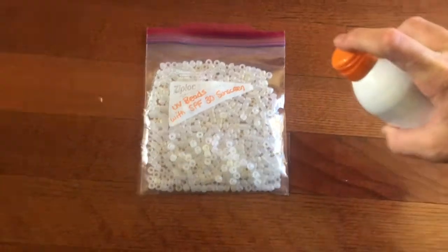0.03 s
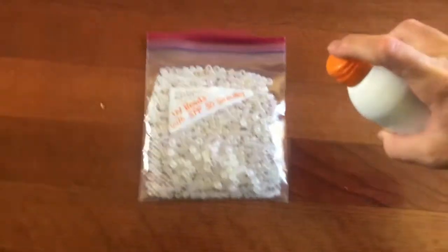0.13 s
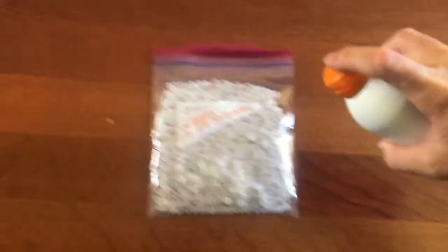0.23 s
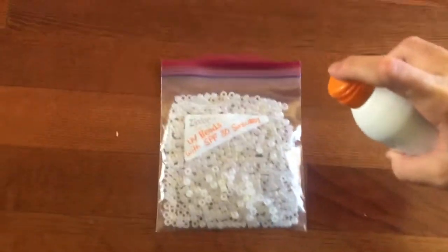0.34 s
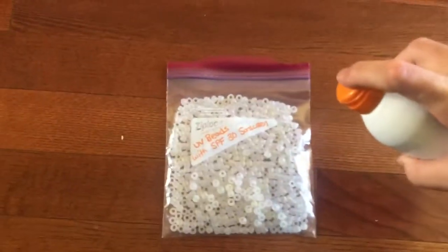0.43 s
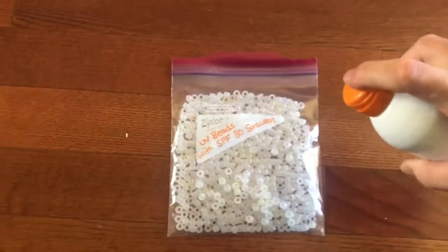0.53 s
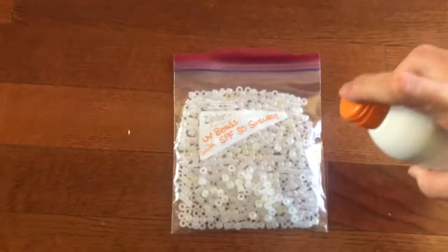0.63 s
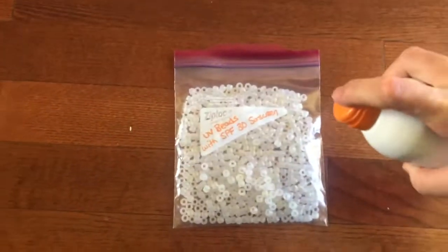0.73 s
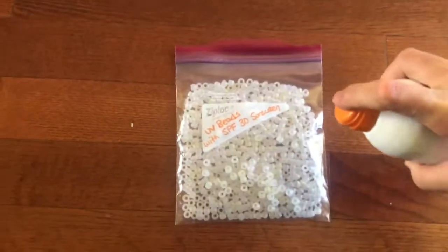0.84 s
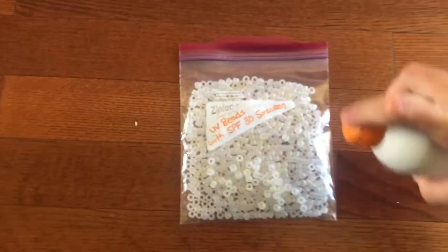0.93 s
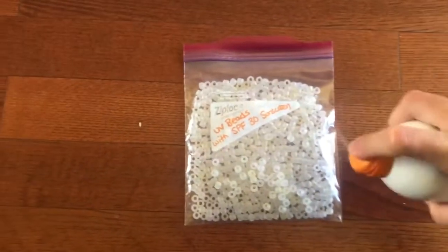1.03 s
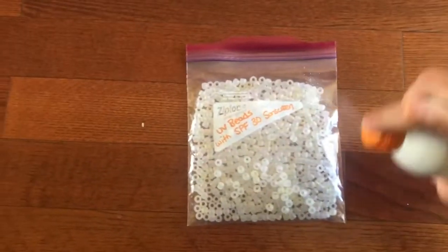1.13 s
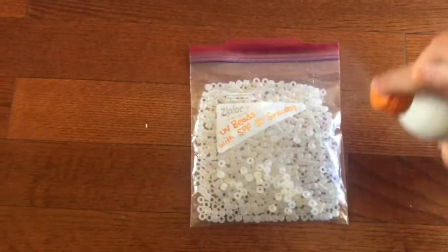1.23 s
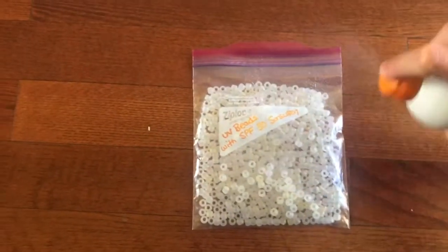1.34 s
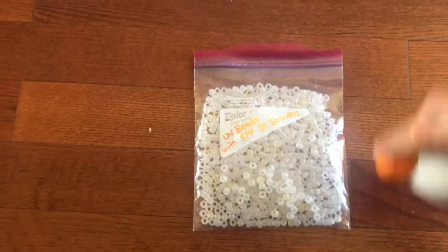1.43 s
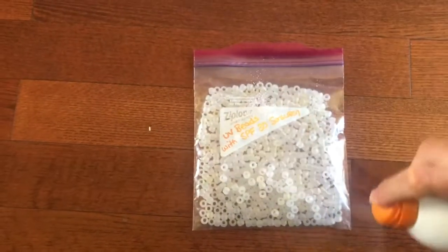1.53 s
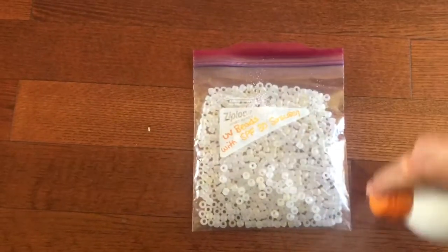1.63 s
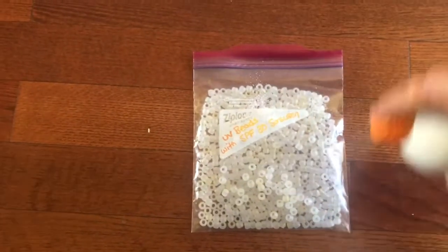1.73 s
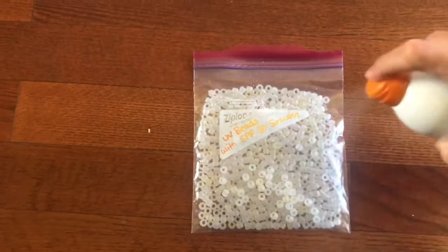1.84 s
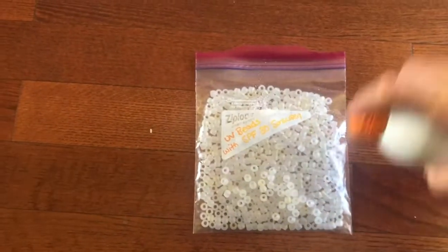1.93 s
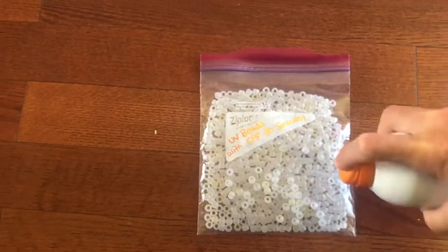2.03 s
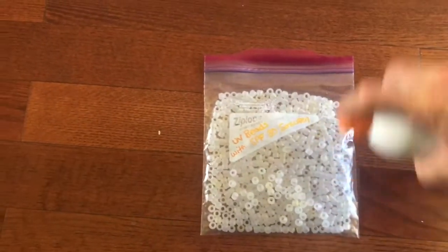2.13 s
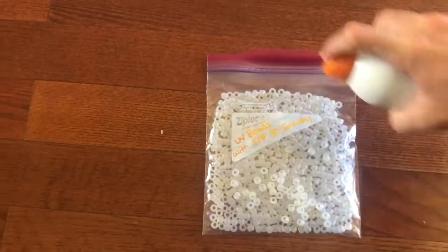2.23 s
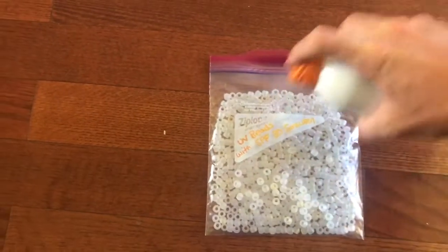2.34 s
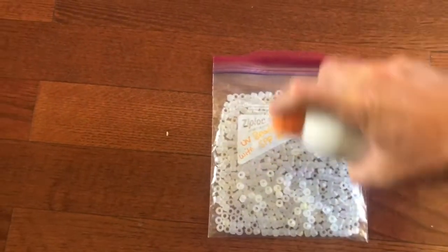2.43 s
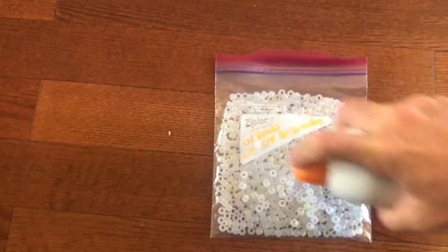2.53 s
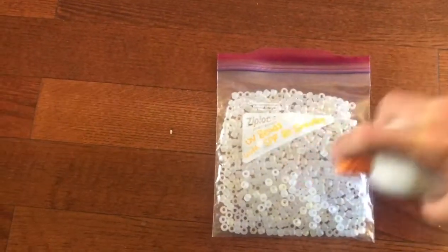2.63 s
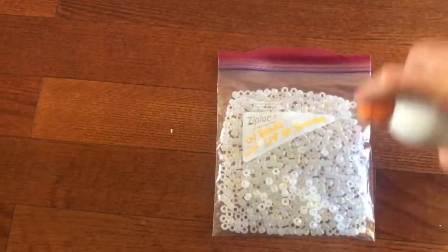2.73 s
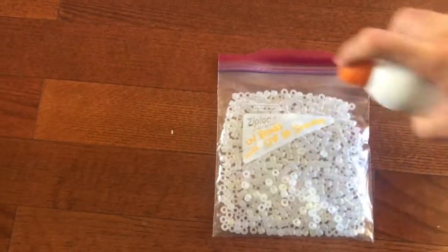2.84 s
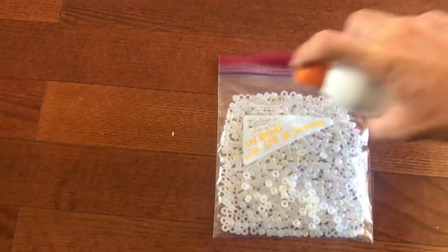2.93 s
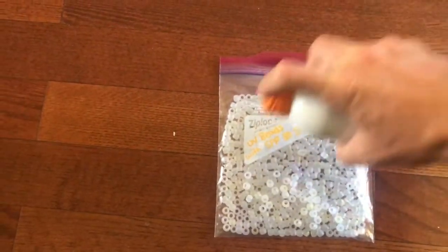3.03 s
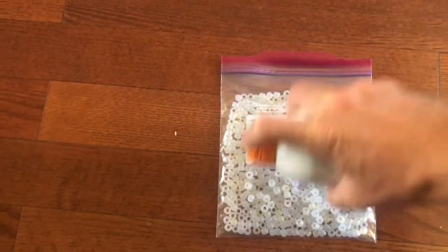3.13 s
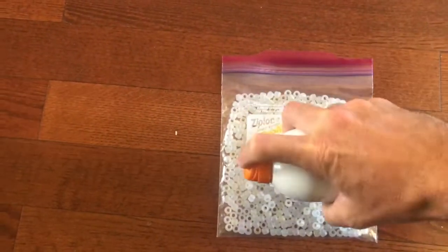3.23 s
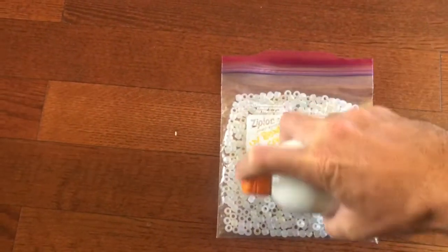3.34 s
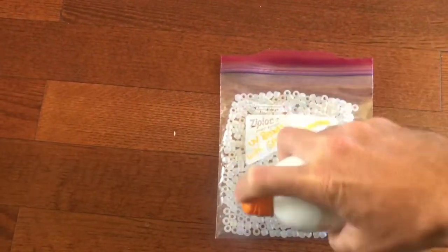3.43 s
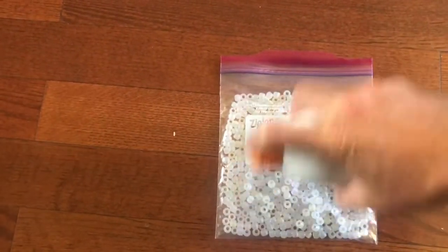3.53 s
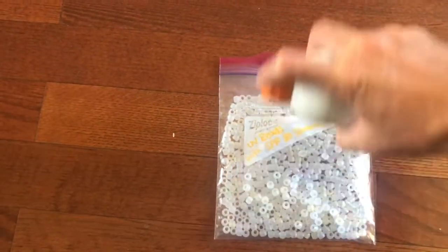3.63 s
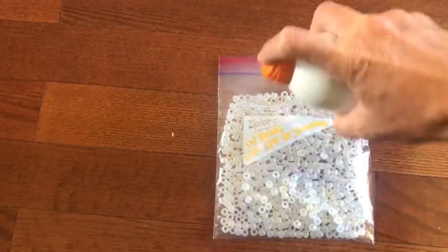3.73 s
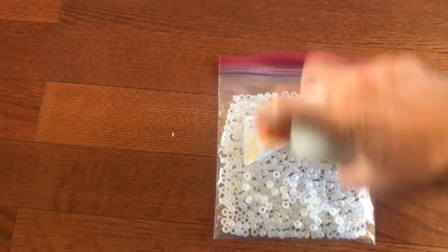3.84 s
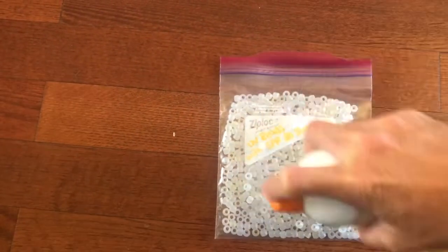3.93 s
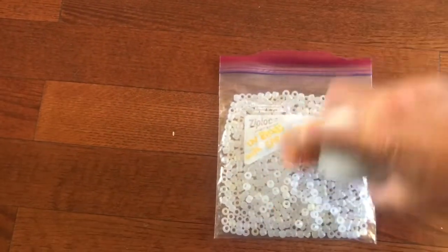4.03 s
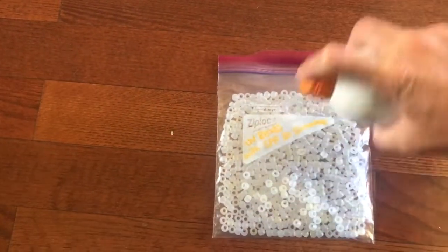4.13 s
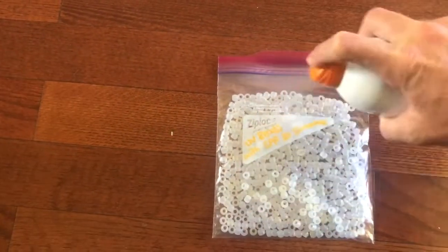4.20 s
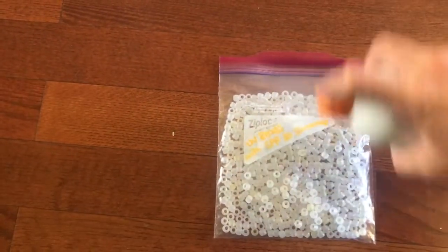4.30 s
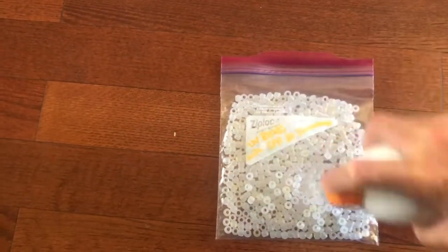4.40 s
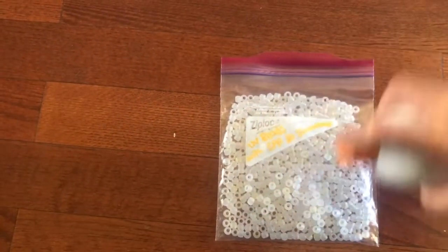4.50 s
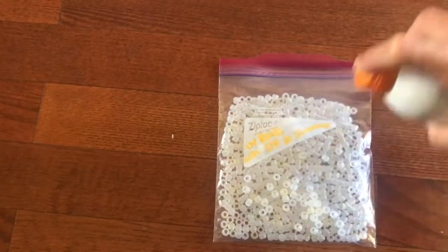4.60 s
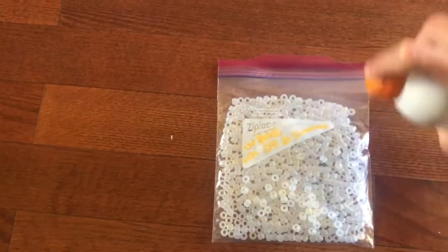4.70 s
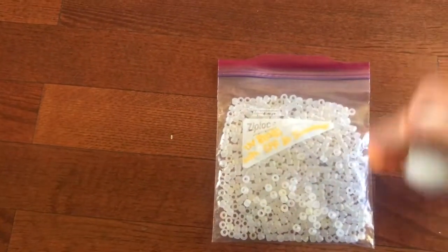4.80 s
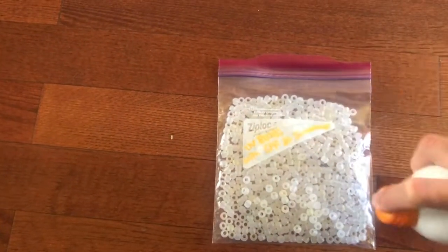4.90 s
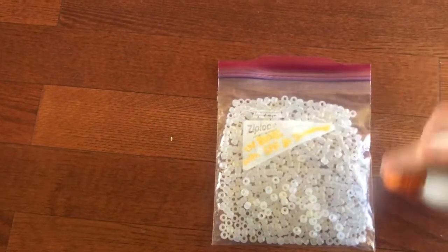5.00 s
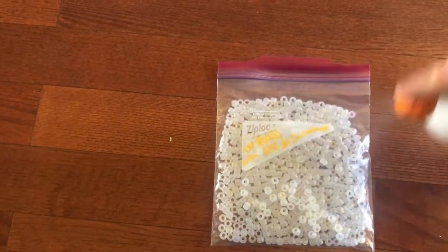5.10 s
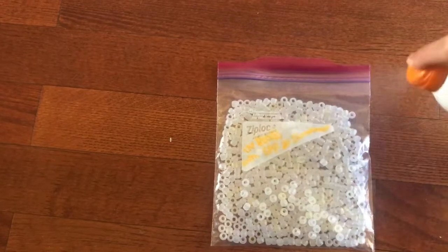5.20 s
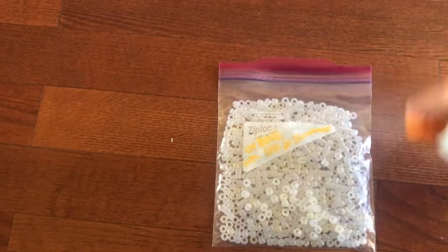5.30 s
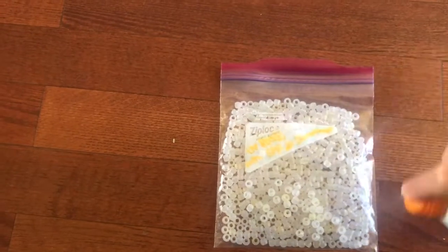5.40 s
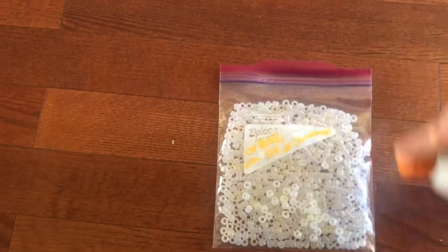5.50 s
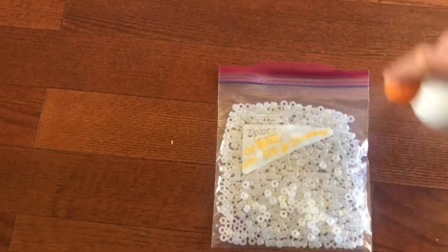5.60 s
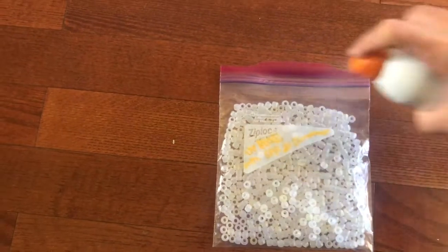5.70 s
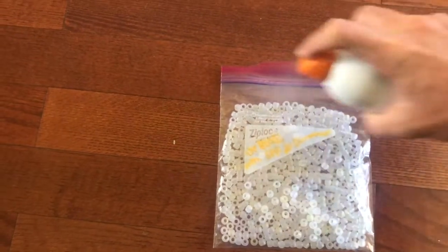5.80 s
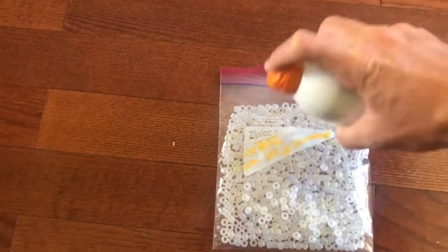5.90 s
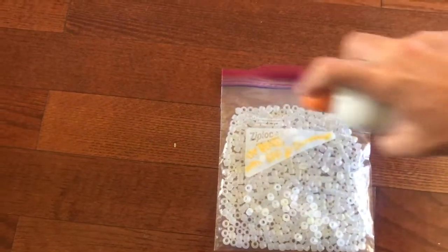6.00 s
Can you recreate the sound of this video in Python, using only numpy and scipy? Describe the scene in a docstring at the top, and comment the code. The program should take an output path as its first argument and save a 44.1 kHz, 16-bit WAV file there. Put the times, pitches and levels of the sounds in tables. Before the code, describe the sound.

After faint plastic ticks, an aerosol can hisses in two long sprays, brightness wavering with the sweeping hand, in a quiet room.

```python
"""Fingers rub softly and a plastic spray head ticks; then an aerosol can of sunscreen sprays two long bursts.
The jet is shaped noise: a roar in the hollow of the spray head, under hiss, sheen and sizzle from the nozzle.
The hand sweeps to and fro about twice a second, and each stroke turns the jet's colour.
Behind it lies a quiet room: steady soft noise, and walls that ring briefly after the valve shuts."""
import sys
import numpy as np
from scipy import signal
from scipy.fft import rfft, irfft, next_fast_len
from scipy.io import wavfile
from scipy.ndimage import uniform_filter1d, map_coordinates

SR = 44100
rng = np.random.default_rng(int(sys.argv[2]) if len(sys.argv) > 2 else 0)


def unload_wav(signal):
    """Save mono or channel-first audio to the path in sys.argv[1] as 16-bit WAV at rate SR, clipped to [-1, 1]."""
    wavfile.write(
        sys.argv[1],
        SR,
        np.round(np.clip(np.atleast_2d(signal).T, -1, 1) * 32767).astype(np.int16),
    )


N = 266963  # length in samples


def amp(db):
    """Decibels to gain."""
    return 10 ** (np.asarray(db) / 20)


def unit(x):
    """x scaled to an rms of 1."""
    return x / np.sqrt(np.mean(x ** 2) + 1e-20)


def along(points, hz):
    """Read (frequency, value) points on a logarithmic frequency axis."""
    f, v = np.transpose(points)
    return np.interp(np.log(hz + 1), np.log(f + 1), v)


def curve(t, presses):
    """Join the (time, value) points of all presses into one value per sample."""
    return np.interp(t, *np.vstack(presses).T)


def wobble(rate):
    """A smooth random curve through `rate` random points a second."""
    return map_coordinates(rng.standard_normal(4096), [np.arange(N) * rate / SR], mode="wrap")


def lagged(x, seconds):
    """x followed sluggishly, with a time constant."""
    keep = np.exp(-1 / (seconds * SR))
    return signal.lfilter([1 - keep], [1, -keep], x)


def glide(x, ratio):
    """x with all its frequencies scaled by a moving ratio."""
    return map_coordinates(x, [np.cumsum(ratio) % (N - 1)], mode="wrap")


def filtered(x, response):
    """x passed through a gain that depends on frequency."""
    size = next_fast_len(N + SR // 2)
    return irfft(rfft(x, size) * response(np.fft.rfftfreq(size, 1 / SR)), size)[:N]


def rush(spectrum, patchy_db):
    """Turbulent noise of rms 1 with drifting patches of colour."""
    z = signal.stft(rng.standard_normal(N), nperseg=512)[2]
    # random louder and softer patches, smoothed over frequency and then over time
    patches = uniform_filter1d(rng.standard_normal(z.shape), size=8, axis=0)
    patches = uniform_filter1d(patches, size=24, axis=1)
    noise = signal.istft(z * amp(patchy_db * unit(patches)), nperseg=512)[1][:N]
    return unit(filtered(noise, lambda hz: amp(along(spectrum, hz))))


def resonant_noise(centre_hz, width_hz):
    """Noise of rms 1 in one steep-sided resonance."""
    def response(f):
        damping = (f * width_hz) ** 2
        return damping / ((centre_hz ** 2 - f * f) ** 2 + damping)
    return unit(filtered(rng.standard_normal(N), response))


FORCE_POWER = 1.64  # roar and treble need a wide-open valve; the hiss lingers
ROAR_BUILD_S = 0.0035  # the hollow takes a moment to sound


def spray(t):
    """The jet: a hollow roar under a hiss and sizzle that follow the flow and a sheen that follows the hand."""
    flow_db = flow(t)
    flank_db, sheen_db, beam_db = hand_swing(t)
    sputter = wobble(rate=160)  # liquid and gas leave the nozzle in uneven shares
    opening = valve(t)
    force = opening ** FORCE_POWER
    hollow = lagged(force, ROAR_BUILD_S) * roar(t)
    nozzle = opening * (hiss(t, flow_db, sputter) + spits_and_bands(t))
    treble = force * (flank(flank_db) + sheen(sheen_db, sputter) + sizzle(flow_db, beam_db, sputter))
    return hollow + nozzle + treble


# shape of the roar's spectrum: (frequency [Hz], relative level [dB])
ROAR_SPECTRUM = [(250, -46.5), (500, -35.5), (700, -24.5), (850, -16), (1000, -6), (1160, 1), (1300, -4),
                 (1420, -6), (1570, -7), (1750, -14), (2300, -15.5), (4000, -59)]
# how the roar swells, one list per press: (time [s], level before ROAR_DB is added [dB])
ROAR_LEVEL = [
    [(1.0, -48.5), (1.12, -54), (1.2, -49), (1.26, -54), (1.63, -40.9), (1.82, -40.0), (2.18, -44),
     (2.27, -40.5), (2.71, -38), (2.92, -46.5)],
    [(3.17, -41.5), (3.36, -46), (3.49, -39), (3.73, -40.5), (3.83, -46), (4.02, -36.5), (4.22, -39),
     (4.4, -37), (6.04, -39)],
]
ROAR_DB, ROAR_PITCH_PER_DB = -0.08, 0.0061  # dB; share of pitch per dB


def roar(t):
    """Turbulence colored by the hollow of the spray head; a stronger roar sits slightly higher."""
    roar_db = curve(t, ROAR_LEVEL)
    pitch = 1 + ROAR_PITCH_PER_DB * (roar_db - np.median(roar_db))
    hollow = glide(rush(ROAR_SPECTRUM, patchy_db=-0.24), pitch)
    return amp(ROAR_DB + roar_db + 0.094 * wobble(rate=32)) * hollow


# presses of the valve: (gas comes [s], liquid comes [s], shuts [s], opening with gas alone [dB],
# opening surge [dB], time constant of the surge's fading [s])
PRESSES = [(0.9925, 1.02, 2.9035, 0, 4.5, .075), (3.141, 3.159, 6.2, -15.5, 6, .022)]
RISE_S, SHUT_T60 = .0025, 0.3  # seconds to open; seconds for the opening to fall by 60 dB


def valve(t):
    """Opening 0-1: gas comes first, the liquid a moment later, and both bleed away on release."""
    out = np.zeros(N)
    for gas, liquid, shuts, gas_db, _, _ in PRESSES:
        gas_opens = np.interp(t, [gas, gas + RISE_S], [0, 1])
        liquid_opens = np.interp(t, [liquid, liquid + RISE_S], [amp(gas_db), 1])
        release = amp(-60 * np.maximum(t - shuts, 0) / SHUT_T60)
        out += gas_opens * liquid_opens * release
    return out


def surge(t):
    """Extra flow in dB from the pressure stored behind the valve."""
    out = np.zeros(N)
    for gas, liquid, _, _, db, fade_s in PRESSES:
        out += db * (t >= gas) * np.exp(-np.maximum(t - liquid, 0) / fade_s)
    return out


# flow through the nozzle, one list per press: (time [s], level before the surge is added [dB])
FLOW = [
    [(1.14, -50.5), (1.35, -52.5), (1.43, -46.5), (1.61, -52), (2.13, -46.5), (2.3, -50), (2.55, -47),
     (2.86, -50.0), (2.92, -43.5)],
    [(3.22, -48.5), (3.78, -50), (4.12, -47), (4.2, -48.5), (4.33, -47), (5.21, -50), (5.73, -47.5),
     (6.04, -49)],
]


def flow(t):
    """Flow in dB, which drives both hiss and sizzle."""
    return curve(t, FLOW) + surge(t)


# shape of the hiss's spectrum: (frequency [Hz], relative level [dB])
HISS_SPECTRUM = [(900, -22), (1500, -13), (1950, 0), (2150, -6.5), (2450, 1), (2800, -1), (3400, -0.5),
                 (4100, -2.5), (4800, -4), (5600, -9), (6400, -13.5), (7800, -14.5), (12000, -19.5)]
HISS_DB = 3  # over the flow


def hiss(t, flow_db, sputter):
    """Turbulence at the nozzle; gas without liquid hisses less."""
    gas_only = sum((t >= gas) & (t < liquid) for gas, liquid, *_ in PRESSES)
    level_db = HISS_DB + flow_db + .5 * sputter - 8 * gas_only
    return amp(level_db) * rush(HISS_SPECTRUM, patchy_db=1.25)


# shape of the sheen's spectrum: (frequency [Hz], relative level [dB])
SHEEN_SPECTRUM = [(5500, -41), (7000, -8), (7900, -5), (9300, 1), (10500, -3.5), (11500, -1), (14000, -29)]
SHEEN_DB = -54.5  # with the can at the far turn


def sheen(sheen_db, sputter):
    """Bright turbulence whose level follows the hand."""
    return amp(SHEEN_DB + sheen_db + 0.22 * sputter) * rush(SHEEN_SPECTRUM, patchy_db=3.0)


# shape of the sizzle's spectrum: (frequency [Hz], relative level [dB])
SIZZLE_SPECTRUM = [(8000, -30.5), (10800, -13), (12000, -1.5), (13000, 2), (13800, 0), (15000, 6.5),
                   (15800, -6)]
SIZZLE_DB = 2.5  # over the flow


def sizzle(flow_db, beam_db, sputter):
    """The highest turbulence, in a narrow beam that the hand swings past the microphone."""
    level_db = SIZZLE_DB + flow_db + beam_db + .4 * sputter
    return amp(level_db) * rush(SIZZLE_SPECTRUM, patchy_db=2.6)


def flank(flank_db):
    """As the beam swings away, its sheen gives way to this lower band."""
    return amp(flank_db) * resonant_noise(6790, 1400)


# bands that color the jet: (start time [s], length [s], centre [Hz], width [Hz],
# level at the middle with the valve fully open [dB])
SPITS_AND_BANDS = [(0.99, .017, 15000, 4500, -39), (1.019, .099, 4550, 3200, -39),
                   (1.02, 0.29, 3100, 2000, -46.5), (1.395, .084, 3900, 2580, -49),
                   (1.996, 0.36, 2800, 450, -46.5), (2.604, 0.54, 2490, 692, -44.5),
                   (2.87, 0.12, 2160, 1000, -40), (3.158, .018, 3680, 3000, -45),
                   (3.16, .08, 1650, 600, -47), (3.166, 0.87, 953, 248, -51.5),
                   (3.95, 1.67, 2360, 450, -50.5), (4.3, 1.6, 12300, 700, -54),
                   (4.697, 1.18, 1680, 353, -46.5), (5.362, .15, 8140, 1100, -51.5)]


def spits_and_bands(t):
    """Short spits of gas and liquid, and longer steady bands that color the spray."""
    out = np.zeros(N)
    for start, length, hz, width_hz, db in SPITS_AND_BANDS:
        progress = np.clip((t - start) / length, 0, 1)
        swell = 2 * np.sqrt(progress * (1 - progress))
        out += amp(db) * swell * resonant_noise(hz, width_hz)
    return out


# to-and-fro strokes of the hand: (far turn time [s], near turn time [s], flank level at the far turn [dB],
# sheen gain at the near turn [dB], sizzle gain where the beam meets the microphone [dB])
STROKES = [(.8, 1.057, -58, 7.5, 2), (1.317, 1.52, -56.5, 6.5, 0.5), (1.87, 2.06, -58, 4, 4.5),
           (2.3, 2.602, -54.5, 3, 2), (2.87, 3.41, -55.5, 5, -1.5), (3.74, 3.97, -53, 3.5, 1.5),
           (4.21, 4.444, -51.5, 7, 4), (4.656, 4.92, -54.5, 7, 4.5), (5.18, 5.445, -53.5, 9.5, 2),
           (5.722, 5.903, -52.5, 4.5, -3.5)]
LAST_TURN_S = 6
BEAM_AT, BEAM_WIDTH = 0.69, .3  # place in the swing (0 far, 1 near) where the beam meets the microphone
FLANK_FALL_DB = 13.5  # the flank falls as the can comes near


def hand_swing(t):
    """The can's place (0 far, 1 near) turned into flank level and gains of sheen and sizzle, in dB."""
    far, near, flank_db, sheen_db, sizzle_db = np.transpose(STROKES)
    turns = np.append(np.column_stack([far, near]), LAST_TURN_S)
    half_strokes = np.interp(t, turns, np.arange(len(turns)))
    swing = (1 - np.cos(np.pi * half_strokes)) / 2
    beam = np.exp(-((swing - BEAM_AT) / BEAM_WIDTH) ** 2)
    flank_level = np.interp(t, far, flank_db) - FLANK_FALL_DB * swing
    sheen_gain = swing * np.interp(t, near, sheen_db)
    sizzle_gain = beam * np.interp(t, near, sizzle_db)
    return flank_level, sheen_gain, sizzle_gain


# ticks of the plastic head: (time [s], knock level [dB], knock pitch [Hz], knock width [Hz],
# bright snap level [dB])
TICKS = [(.3305, -53.5, 3660, 1400, -63), (.4805, -48, 2000, 4000, -53), (0.8453, -60, 9000, 7000, -46.5),
         (.864, -80, 3000, 3000, -61), (0.9486, -49, 1000, 1000, -51.5), (.9785, -68.5, 2000, 2000, -54)]
SNAP_HZ, SNAP_WIDTH_HZ = 15000, 5000
CRACK_DB = -10  # a broad crack under each knock, relative to the knock


def ticks(t, t60):
    """The finger settles on the head, whose heavily damped plastic gives a knock, a crack and a bright snap."""
    out = np.zeros(N)
    for start, knock_db, hz, width_hz, snap_db in TICKS:
        knock = resonant_noise(hz, width_hz) + amp(CRACK_DB) * resonant_noise(5900, 7000)
        snap = resonant_noise(SNAP_HZ, SNAP_WIDTH_HZ)
        decay = (t >= start) * amp(-60 * np.abs(t - start) / t60)
        out += decay * (amp(knock_db) * knock + amp(snap_db) * snap)
    return out


GRIP_S, GRIP_SPREAD_S, GRIP_DB = .34, .25, -67.5  # time of the peak, spread, level at the peak
GRIP_HZ, GRIP_WIDTH_HZ = 1200, 3400


def grip(t):
    """The fingers rub softly on the can as they find their hold."""
    swell = np.exp(-((t - GRIP_S) / GRIP_SPREAD_S) ** 2)
    return amp(GRIP_DB) * swell * resonant_noise(GRIP_HZ, GRIP_WIDTH_HZ)


# how long the room rings: (frequency [Hz], time to fall by 60 dB [s])
WALLS = [(300, 0.78), (2000, 0.36), (6000, 0.35), (15000, 0.28)]


def room(x, t):
    """The walls' answer: it dies sooner in the treble and changes as the can moves."""
    out = np.zeros(N)
    places = np.linspace(0, t[-1], num=20)  # times at which a new random echo pattern takes over
    for s in places:
        hz, age, z = signal.stft(rng.standard_normal(SR // 2), SR, nperseg=256)
        decay = amp(-60 * age / along(WALLS, hz)[:, None])
        tail = signal.istft(z * decay, SR, nperseg=256)[1]
        share = np.sqrt(np.clip(1 - np.abs(t - s) / places[1], 0, 1))  # crossfade between patterns
        out += signal.oaconvolve(x * share, tail / np.linalg.norm(tail))[:N]
    return out


# shape of the quiet room's spectrum: (frequency [Hz], relative level [dB])
AIR_SPECTRUM = [(20, -34), (35, -13), (60, 1), (120, -1), (180, -5), (330, -6.5), (600, -11), (1300, -13),
                (2100, -14.5), (3200, -17), (5700, -21), (10000, -21), (15800, -23)]
AIR_DB = -69.8


def air():
    """The quiet room's steady noise, strongest in the bass."""
    return amp(AIR_DB) * rush(AIR_SPECTRUM, patchy_db=1.9)


JET_WET_DB, HAND_WET_DB = -12.5, -17  # how much of each the walls send back


def scene():
    """Can, hand and room, the same in both channels."""
    t = np.arange(N) / SR
    jet = spray(t)
    hand = ticks(t, t60=0.015) + grip(t)
    walls = room(amp(JET_WET_DB) * jet + amp(HAND_WET_DB) * hand, t)
    mono = jet + hand + walls + air()
    return np.array([mono, mono])


TOP_HZ = 15900


def record(dry):
    """The recorder keeps nothing from its band limit upward."""
    return np.array([filtered(x, lambda hz: hz < TOP_HZ) for x in dry])


dry = scene()
out = record(dry)
unload_wav(out)
```